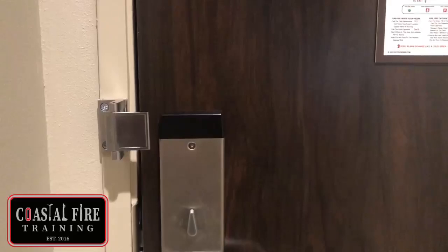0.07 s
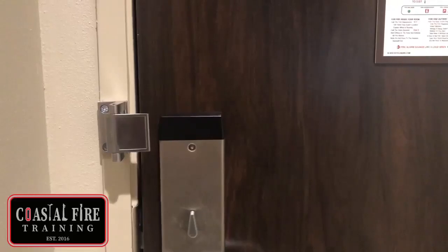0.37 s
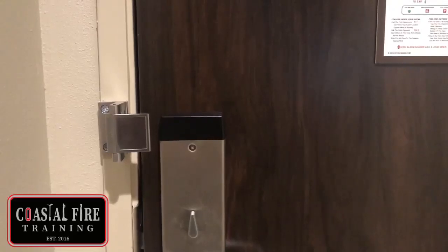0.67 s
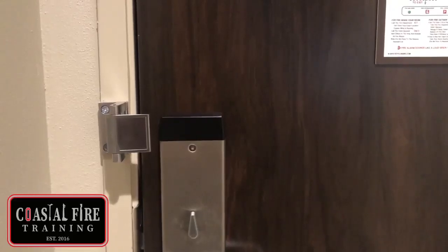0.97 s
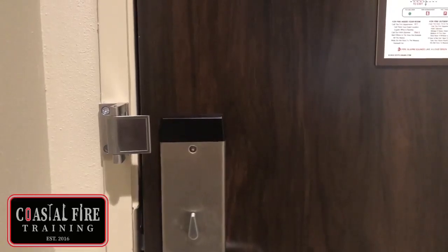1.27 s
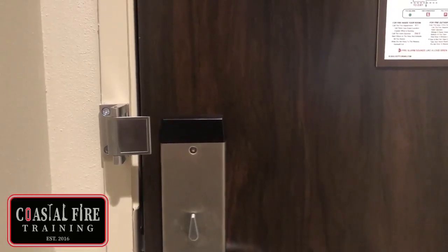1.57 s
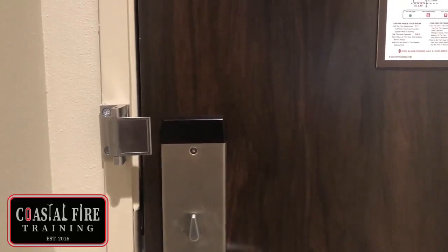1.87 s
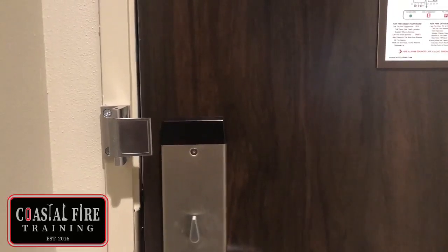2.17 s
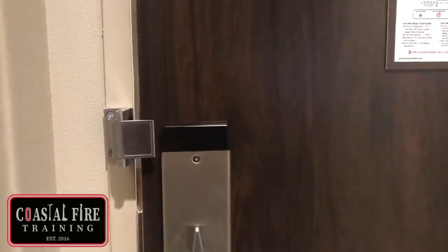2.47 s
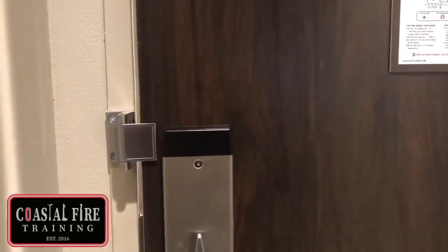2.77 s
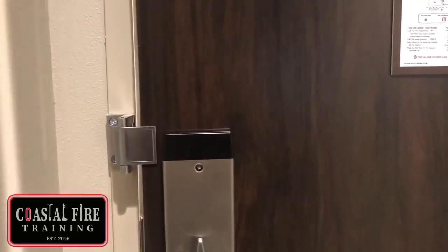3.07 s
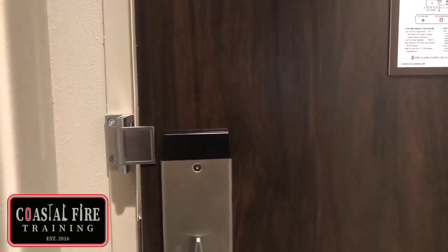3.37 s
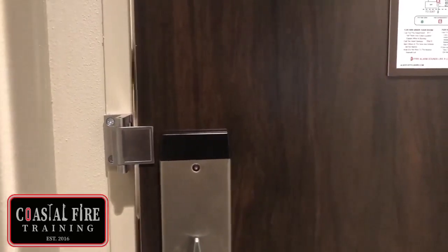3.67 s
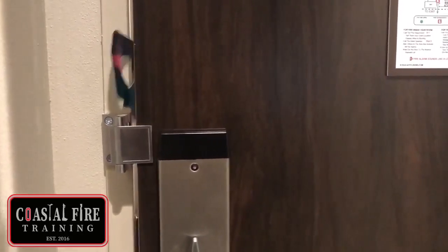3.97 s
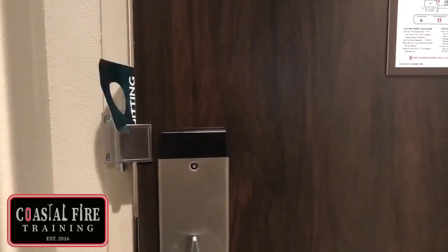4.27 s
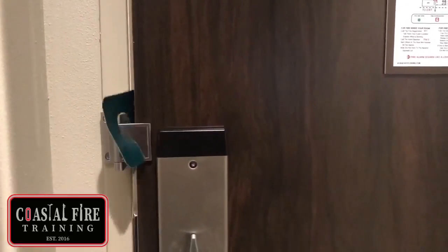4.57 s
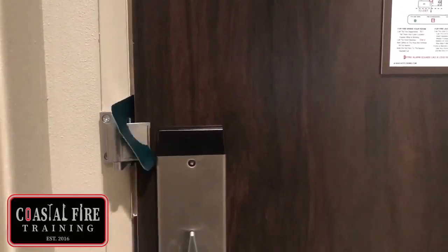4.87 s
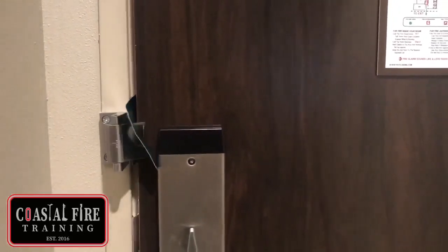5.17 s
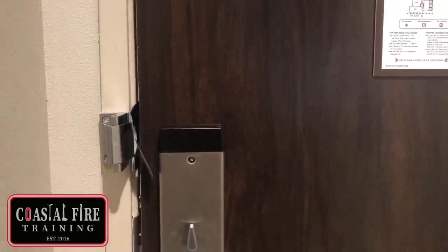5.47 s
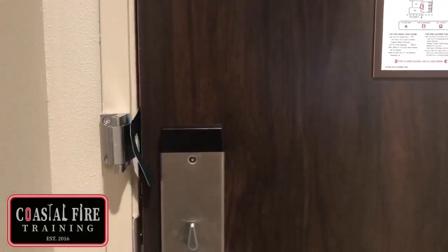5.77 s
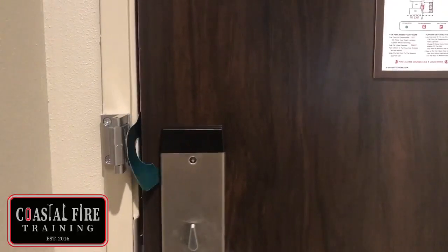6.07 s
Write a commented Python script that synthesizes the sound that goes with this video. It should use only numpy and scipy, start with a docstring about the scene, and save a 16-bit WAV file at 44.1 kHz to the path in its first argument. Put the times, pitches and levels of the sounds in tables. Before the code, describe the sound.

Close by in a small room, a door lever grinds and the latch clicks and clacks. The heavy wooden door opens and knocks against its steel swing guard. A plastic card scrapes faintly through the gap and flips the guard with a sharp clack. The door bumps its frame, and the pinched card slips out in a fast, even rattle ending in a snap. Ventilation hums softly throughout.

```python
"""In a small room, the lever of a heavy wooden door turns, the latch snaps back and the door opens
against its steel swing guard. A plastic card scrapes through the gap and flips the guard over with
a clack. The door bumps the frame, and the pinched card sticks and slips out in a fast, even rattle.
Each knock is a puff of noise plus the fading tones of the struck part. Ventilation hums behind it all."""
import sys
import numpy as np
from scipy import signal
from scipy.fft import rfft, irfft, next_fast_len
from scipy.io import wavfile
from scipy.ndimage import map_coordinates

SR = 44100
rng = np.random.default_rng(int(sys.argv[2]) if len(sys.argv) > 2 else 0)


def pcm_store(signal):
    """Save signal as 16-bit PCM."""
    levels = np.round(np.clip(np.atleast_2d(signal), -1, 1) * 32767)
    wavfile.write(sys.argv[1], SR, levels.astype(np.int16).T)


N = 278712
TIME = np.arange(N) / SR
AGE = np.arange(SR) / SR  # seconds since a blow

# Modes are the tones a struck part rings at; t60 is the time they take to fade by 60 dB.
# modes of the wooden door, the lock case and the steel guard: f/Hz, level/dB, t60/s
DOOR_MODES = [(97.2, -9, 0.37), (132.9, -1.5, 0.27), (154.2, 0.5, 0.18), (172.2, 0, 0.23),
              (204.6, -2.5, 0.25), (257.8, -7, 0.24), (304.3, -4.5, 0.28), (382, -11.5, 0.35),
              (410.7, -14.5, 0.82), (502, -17, 0.18), (576, -9.5, 0.35), (660, 8, 0.13), (742, -7, 0.34)]
CASE_MODES = [(605.4, 0.5, 0.29), (675, -7.5, 0.16), (773, -9.5, 0.65), (814, -30, 0.66),
              (980.6, -2.5, 0.17), (1043, -10, 0.51), (1154, -1, 0.26), (1213, -3.5, 0.13),
              (1311, -17.5, 0.38), (1553, -30.5, 0.18), (1684, -32, 0.4), (2300, -16, 0.22),
              (3090, -13, .2)]
GUARD_MODES = [(1395, -2, .04), (1519, -10, .045), (3854, -10, .062), (3941, -25, .32), (7180, -2, .047),
               (7224, -25, .24), (7380, -5, .049), (7500, -15, .05), (11100, -13.5, .055),
               (11800, -9.5, .033)]
# blows on the guard (harder ones click more): t/s, level/dB, hardness/dB
GUARD_BLOWS = [(2.633, -14, -16), (2.658, -23, -5), (2.777, -28.5, -17.5), (2.899, -23.5, -14),
               (2.977, -37, -14.5), (3.048, -36.5, -21), (4.862, -15, -2), (5.029, -26, -2),
               (5.087, -35.5, -7.5)]
# spectra of a click, the high fizz on top of it and the card's knock on wood: f/Hz, level/dB
CLICK_SPECTRUM = [(900, -11.5), (2000, -1.5), (3100, 1.5), (4500, -2), (6500, -7), (8500, -24),
                  (14000, -22)]
FIZZ_SPECTRUM = [(4000, -36.5), (7000, -3), (8500, 2.5), (10500, -5), (11500, -11.5), (15500, -24.5)]
KNOCK_SPECTRUM = [(100, -69), (260, -9), (500, -8), (850, -3), (1250, -7.5), (2000, -10), (4000, -48),
                  (12000, -70)]


def lock():
    """Lever, bolt and guard knock through the lock case; the bolt and the lever's spring ring too."""
    # knocks in the lock, and a faint tick just before the loudest one:
    # t/s, level/dB, strongest f/Hz, hardness/dB
    knocks = [(1.146, -43.5, 945, -1.5), (1.266, -40, 970, -3.5), (1.814, -30.5, 1430, -9.5),
              (1.921, -25.5, 880, 1.5), (1.95, -23.5, 746, -2.5), (1.979, -29, 640, -0.5),
              (2.032, -22.5, 1100, -5.5), (2.22, -26, 730, -17), (2.321, -45, 1500, 5.5),
              (2.332, -15, 1020, -1), (2.365, -20, 982, -5), (5.331, -33, 676, 4),
              (5.381, -21.5, 650, -3.5)]
    # modes of the latch bolt and the lever's spring: f/Hz, level/dB, t60/s
    bolt_modes = [(2430, -8.5, 0.15), (3053, 8, 0.019), (4420, -6.5, 0.025), (6680, -9, 0.062)]
    spring_modes = [(4310, 8.5, .03), (6880, -14, 0.18), (8400, -20, .1)]
    out = np.zeros(N)
    for s, db, hz, hardness_db in knocks:
        add_metal_knock(out, s, db, hz, hardness_db, t60=0.061)
    for s, db, hardness_db in GUARD_BLOWS:
        hz = 1270 + 7.5 * hardness_db  # harder blows knock higher
        add_metal_knock(out, s, db, hz, hardness_db, t60=0.059)
    for s, db, _, hardness_db in knocks:
        add(out, s, amp(db + hardness_db - 15) * ring(bolt_modes, rise=0.0004))
    add(out, 1.813, amp(-47.5) * ring(spring_modes, rise=0.00055))  # the pressed spring pings
    return out


def add_metal_knock(track, s, db, hz, hardness_db, t60):
    """A light graze, then a metallic knock that rings the lock case, with a click on top."""
    # how strongly the blow drives each pitch: f/Hz, level/dB
    push = [(hz * .05, -32), (hz * .4, -13), (hz * .9, -1), (hz * 1.25, 0),
            (hz * 1.8, -13), (hz * 4, -36), (hz * 10, -75)]
    modes = [(f, level + along(push, f), life) for f, level, life in CASE_MODES]
    click_db, fizz_db = db + hardness_db, db + 1.78 * hardness_db
    graze = amp(click_db - 7) * burst(CLICK_SPECTRUM, t60=0.01, rise=0.0012)
    graze += amp(db - 24.5) * burst(push, t60=0.036, rise=0.00081)
    add(track, s - 0.0044, graze)  # heard just before the knock
    add(track, s, amp(db - 19) * ring(modes, rise=0.0022))
    add(track, s, amp(db - 4) * burst(push, t60, rise=0.0015))
    add(track, s, amp(click_db - 3.5) * burst(CLICK_SPECTRUM, t60 * 0.49, rise=0.00024))
    add(track, s, amp(fizz_db - 11) * burst(FIZZ_SPECTRUM, t60 * 0.74, rise=0.00019))


def guard():
    """The steel swing guard rings briefly; softer blows miss its highest modes."""
    out = np.zeros(N)
    hardest_db = max(db + hardness_db for _, db, hardness_db in GUARD_BLOWS)
    lowest_hz = GUARD_MODES[0][0]
    for s, db, hardness_db in GUARD_BLOWS:
        tilt = 0.57 * (db + hardness_db - hardest_db)  # dB per octave
        modes = [(hz, level + tilt * np.log2(hz / lowest_hz), t60) for hz, level, t60 in GUARD_MODES]
        add(out, s, amp(db + 0.61 * tilt) * ring(modes, rise=0.00063))
    return out


def door():
    """Soft blows reach only the door's low modes; it sways on after them, most when it hangs free."""
    # blows on the door: t/s, level/dB, strongest f/Hz
    thuds = [(1.813, -40.5, 467), (1.927, -25.5, 185), (2.034, -25, 342), (2.336, -30.5, 277),
             (2.642, -23.5, 154), (2.685, -25, 109), (2.906, -32.5, 164), (2.945, -32, 161),
             (4.866, -30.5, 245), (5.388, -22, 200), (6.06, -30, 165), (6.104, -35.5, 160)]
    sway_hz, free_from_s, free_to_s = 49.97, 2.67, 3.5
    sway = np.sin(2 * np.pi * sway_hz * AGE) * envelope(t60=0.74, rise=0.055)
    out = np.zeros(N)
    for s, db, hz in thuds:
        # how strongly the blow drives each pitch: f/Hz, level/dB
        push = [(hz * 0.32, -22), (hz * 0.72, -3), (hz, 0), (hz * 0.95, -2),
                (hz * 3.06, -14), (hz * 5, -32), (hz * 20, -85)]
        modes = [(f, level + along(push, f), t60) for f, level, t60 in DOOR_MODES]
        sway_db = -2 if free_from_s < s < free_to_s else -13.5
        add(out, s, amp(db) * (ring(modes, rise=0.006) + amp(sway_db) * sway))
        add(out, s, amp(db - 1.8) * burst(push, t60=0.095, rise=0.0051))
    return out


def card_rattle(from_s=5.7712, to_s=6.1735, slips=9):
    """The pinched card sticks and slips evenly; each slip cracks in the plastic, then shakes the door."""
    # pitches the card rings at: f/Hz, width/Hz, level/dB
    card_peaks = [(3030, 980, -1.5), (4670, 610, -3), (5500, 3500, -9.5), (8600, 1500, -7),
                  (10100, 1440, -3), (13400, 2500, -12)]
    cracks, knocks = np.zeros(N), np.zeros(N)
    plastic, wood = peak_spectrum(card_peaks), through_door(KNOCK_SPECTRUM)
    crack = lambda: burst(plastic, t60=0.013, rise=0.0025)
    knock = lambda: burst(wood, t60=0.13, rise=0.0013)
    usual_crack, usual_knock = crack(), knock()  # the same spot slips every time
    for k, s in enumerate(np.linspace(from_s, to_s, slips)):
        db = -12.5 if k else -13.5  # the first slip is weaker
        add(cracks, s, amp(db + 4) * (0.33 * usual_crack + 0.94 * crack()))
        edge_flick = burst(FIZZ_SPECTRUM, t60=0.01, rise=0.00023)
        add(cracks, s + 0.0045, amp(db - 12) * edge_flick)
        add(cracks, s + 0.0017, amp(db - 16.5) * burst(plastic, t60=0.053, rise=0.00034))
        add(knocks, s + 0.004016, amp(-29.5) * (0.46 * usual_knock + 0.65 * knock()))
        add(knocks, s + 0.00387, amp(-46.5) * ring(CASE_MODES, rise=0.002))
    return cracks, knocks


def card_snaps(t60=0.034):
    """The card's edge flicks past the frame and the guard."""
    # flicks: t/s, click level/dB, knock level/dB
    snaps = [(3.6538, -40.5, -50.5), (4.0984, -34, -39.5), (4.115, -36.5, -50), (4.2288, -50, -43),
             (4.2779, -34.5, -42.5), (4.4268, -49, -45.5), (4.6042, -46.5, -40.5), (5.3006, -33, -45),
             (5.662, -26.5, -37.5), (6.2193, -10.5, -33), (6.226, -18.5, -26)]
    out = np.zeros(N)
    for s, click_db, knock_db in snaps:
        add(out, s, amp(click_db - 6.5) * burst(CLICK_SPECTRUM, t60, rise=0.00047))
        add(out, s, amp(click_db - 17) * burst(FIZZ_SPECTRUM, t60, rise=0.00025))
        add(out, s, amp(knock_db - 4.5) * burst(KNOCK_SPECTRUM, t60 * 3.2, rise=0.0025))
    return out


def card_scrape(drag_from_s=5.7712):
    """The card scrapes along wood and paint in short pushes, then drags as it slips out."""
    # pushes through the gap: t/s, length/s, rub level/dB, hiss level/dB
    pushes = [(3.63, 0.34, -65.5, -67), (4.206, 0.27, -59.5, -61.5), (4.604, 0.16, -52, -55.5),
              (4.802, 0.049, -63, -59.5), (5.035, 0.38, -50.5, -63.5), (5.283, 0.14, -42, -46.5),
              (5.462, 0.17, -47.5, -45), (5.595, 0.26, -50, -62), (6.001, 0.11, -37.5, -47.5),
              (6.176, 0.1, -46.5, -33)]
    # spectra of the low rub and the high hiss: f/Hz, level/dB
    rub_spectrum = [(250, -5.5), (600, 5), (1200, 5.5), (1800, 3), (2500, -5), (5000, -22), (12000, -66)]
    hiss_spectrum = [(1500, -54), (3100, -4), (4000, -0.5), (5300, -5.5), (7500, -5.5), (10000, -8),
                     (15500, -20)]
    drag = strokes([(drag_from_s, TIME[-1] - drag_from_s, 0)])
    rub_gain = strokes([(s, length, db) for s, length, db, _ in pushes]) + amp(-45.5) * drag
    hiss_gain = strokes([(s, length, db) for s, length, _, db in pushes]) + amp(-50) * drag
    rub = friction(through_door(rub_spectrum), rate=120, grain_db=2.5)
    hiss = amp(-6.5) * friction(hiss_spectrum, rate=210, grain_db=3.5) + amp(-4.5) * grit()
    return rub_gain * rub + hiss_gain * hiss


def lever_grind():
    """The lever grinds in its bearing as it turns."""
    # turns of the lever: t/s, length/s, level/dB
    turns = [(1.09, 0.22, -50.5), (1.81, 0.22, -44), (1.905, 0.14, -33.5), (2.12, 0.21, -48)]
    # spectrum of the grinding: f/Hz, level/dB
    grind_spectrum = [(150, -16), (450, -4.5), (620, 1.5), (1000, 2), (1500, -5.5), (2200, -6), (5000, -21),
                      (15000, -34)]
    grind = friction(through_door(grind_spectrum), rate=150, grain_db=4)
    return strokes(turns) * (grind + amp(-19) * grit())


def squeaks():
    """Now and then the rubbing sings around one pitch."""
    # squeaky movements: t/s, length/s, level/dB, f/Hz, width/Hz
    squeaky_moves = [(1.11, 0.25, -58.5, 1400, 300), (1.823, 0.11, -43.5, 1290, 510),
                     (3.657, .088, -68, 8600, 1800), (3.671, .19, -62, 5100, 1500),
                     (5.483, 0.054, -43, 3150, 450), (5.485, 0.04, -51, 5400, 900),
                     (6.192, .066, -33, 1607, 110), (6.239, 0.16, -44, 1780, 110)]
    out = np.zeros(N)
    for s, length, db, hz, width in squeaky_moves:
        gain = amp(db) * swell(length)
        add(out, s, gain * noise(peak_spectrum([(hz, width, 0)]), len(gain)))
    return out


def hinge_rub(width_hz=200, db_per_octave=-7):
    """The guard's hinge rubs and sings in the steel's upper modes, less in the highest."""
    lowest_hz = GUARD_MODES[0][0]
    peaks = [(hz, width_hz, db + db_per_octave * np.log2(hz / lowest_hz))
             for hz, db, _ in GUARD_MODES if hz > 3000]
    return strokes([(5.175, 0.12, -59)]) * noise(peak_spectrum(peaks))


def room_echo(sound, block=4096):
    """The walls of a small room return a short wash of echoes, a little different at each moment."""
    # spectrum of the echoes: f/Hz, level/dB
    echo_spectrum = [(60, -4), (250, 6), (600, 1.5), (1200, -1.5), (2500, -2.5), (6000, -1), (10000, -7),
                     (16000, 1.5)]
    # how long they last: f/Hz, t60/s
    fade_times = [(100, 0.77), (500, 0.78), (1200, 0.52), (4000, 0.43), (8000, 0.33), (15000, 0.22)]
    out = np.zeros(N)
    for start in range(0, N, block):
        hz, t, bands = signal.stft(rng.standard_normal(SR // 2), SR, nperseg=256)
        level_db = along(echo_spectrum, hz)[:, None] - 60 * t / along(fade_times, hz)[:, None]
        tail = signal.istft(bands * amp(level_db), SR, nperseg=256)[1]
        tail *= 1 - np.exp(-(AGE[:len(tail)] / 0.0029) ** 2)  # sound takes time to reach the walls
        tail /= np.linalg.norm(tail)
        add(out, start / SR, signal.fftconvolve(sound[start:start + block], tail))
    return out


def ventilation(from_s=0.144, hum_hz=56.5):
    """Duct rumble, a slightly wavering fan hum, and rushing air with a soft whistle."""
    # loudness of rumble and hum: t/s, level/dB
    rumble_levels = [(.15, -56), (2.0, -55), (3.6, -50.5), (6.3, -52.5)]
    # spectra of the duct and the air: f/Hz, level/dB
    rumble_spectrum = [(15, -14), (28, -29), (46, -9), (60, 5.5), (80, -17.5), (105, -9.5), (125, -1.5),
                       (145, -5.5), (175, -4), (280, -10.5), (400, -19.5), (600, -42.5), (1200, -67)]
    air_spectrum = [(200, -11.5), (450, 0.5), (620, 1), (780, 2), (880, 15.5), (980, 1.5), (1200, -2.5),
                    (1500, -10.5), (3200, -13), (7000, -17.5), (10000, -21), (15500, -24.5)]
    rumble_gain = amp(np.interp(TIME, *np.transpose(rumble_levels)))
    hum_gain = amp(1 + 1.2 * wobble(6))
    hum = hum_gain * np.sin(2 * np.pi * hum_hz * TIME + 0.28 * wobble(17))
    fade_in = np.clip((TIME - from_s) / 0.015, 0, 1)
    return fade_in * (rumble_gain * (noise(rumble_spectrum) + hum) + amp(-63.5) * noise(air_spectrum))


def envelope(t60, rise, size=SR):
    """The loudness after a blow: it builds up, then dies away (both times in seconds)."""
    age = AGE[:size]
    return amp(-60 * age / t60) * (1 - np.exp(-age / rise))


def burst(spectrum, t60, rise, size=16384):
    """A puff of noise: a crowd of quickly dying modes, with the same energy at every blow."""
    shape = envelope(t60, rise, size)
    sound = noise(spectrum, size) * shape
    return sound * np.linalg.norm(shape) / np.linalg.norm(sound)


def ring(modes, rise, scatter_db=1.5):
    """Fading pure tones; each blow shares the same energy among them in a new way."""
    draws = rng.standard_normal((len(modes), 2))
    fades = [amp(db) * envelope(t60, rise) for _, db, t60 in modes]
    tones = sum(amp(scatter_db * share) * fade * np.sin(2 * np.pi * (hz * AGE + phase))
                for (hz, _, _), fade, (share, phase) in zip(modes, fades, draws))
    return tones * np.linalg.norm(fades) / np.sqrt(2) / np.linalg.norm(tones)


def friction(spectrum, rate, grain_db, catch_db=1.5):
    """Rubbing: fine grains of noise, clumped into slower uneven catches."""
    level_db = grain_db * np.tanh(wobble(rate)) + catch_db * np.tanh(wobble(rate / 4))
    return coloured(rng.standard_normal(N) * amp(level_db), spectrum)


def grit(ticks_per_s=220, spread_db=5.5):
    """Grit caught in the rubbing makes tiny ticks of uneven size at random moments."""
    moments = rng.random(N) < ticks_per_s / SR
    sizes = amp(spread_db * np.clip(rng.standard_normal(N), -2, 2))
    tick = burst(CLICK_SPECTRUM, t60=0.015, rise=0.00056)
    return unit(signal.fftconvolve(moments * sizes, tick)[:N])


def peak_spectrum(peaks):
    """A spectrum with one hump for each row of f/Hz, width/Hz, level/dB."""
    hz = np.geomspace(200, 18000, 600)
    power = sum(amp(db) ** 2 / (1 + ((hz * hz - f * f) / (hz * width)) ** 2) ** 2.05
                for f, width, db in peaks)
    return np.column_stack([hz, 10 * np.log10(power)])


def through_door(spectrum, boost_db=7, width_hz=22):
    """A spectrum as the door gives it off: stronger at the modes of the wood and the lock case."""
    hz = np.geomspace(20, 20000, 1500)
    peaks = [1 / (1 + ((hz - f) / width_hz) ** 2) for f, _, _ in DOOR_MODES + CASE_MODES]
    return np.column_stack([hz, along(spectrum, hz) + boost_db * np.max(peaks, axis=0)])


def swell(length):
    """The rise and fall of one hand movement: half a sine wave."""
    return np.sin(np.linspace(0, np.pi, round(length * SR)))


def strokes(rows):
    """Loudness over time for hand movements given as t/s, length/s, level/dB."""
    out = np.zeros(N)
    for s, length, db in rows:
        add(out, s, amp(db) * swell(length))
    return out


def noise(spectrum, size=N):
    """Random noise with the given spectrum."""
    return coloured(rng.standard_normal(size), spectrum)


def coloured(sound, spectrum):
    """Filter a sound by a spectrum and bring it to average level 1."""
    hz = np.fft.rfftfreq(len(sound), 1 / SR)
    return unit(irfft(rfft(sound) * amp(along(spectrum, hz)), len(sound)))


def wobble(rate):
    """A smooth curve through `rate` random points a second."""
    return map_coordinates(rng.standard_normal(int(N * rate / SR) + 4), [TIME * rate])


def along(points, hz):
    """Read between rows of f/Hz, value, with octaves evenly spaced."""
    freqs, values = np.transpose(points)
    return np.interp(np.log(hz + 1), np.log(freqs), values)


def amp(db):
    """Turn decibels into a gain."""
    return 10 ** (np.asarray(db) / 20)


def unit(sound):
    """Scale to an average (rms) level of 1."""
    return sound / np.sqrt(np.mean(sound ** 2) + 1e-20)


def add(track, s, sound):
    """Mix a sound into the track, starting at s seconds."""
    start = round(s * SR)
    track[start:start + len(sound)] += sound[:N - start]


def scene():
    """Everything happens at the door's edge; each part sends its own share into the room."""
    cracks, knocks = card_rattle()
    # sound, level sent into the room/dB
    sources = [(lock(), -6), (guard(), -16), (door(), -17.5), (card_snaps(), -5), (cracks, -7),
               (knocks, -7.5), (lever_grind() + card_scrape() + hinge_rub() + squeaks(), -9.5)]
    direct = sum(sound for sound, _ in sources)
    echoes = room_echo(sum(sound * amp(send_db) for sound, send_db in sources))
    return (direct + echoes + ventilation())[None]


def record(dry, top_hz=16000):
    """Cut away the very highest treble."""
    size = next_fast_len(N + 8192)
    hz = np.fft.rfftfreq(size, 1 / SR)
    return irfft(rfft(dry, size) / (1 + (hz / top_hz) ** 120), size)[..., :N]


dry = scene()
out = record(dry)
pcm_store(out)
```